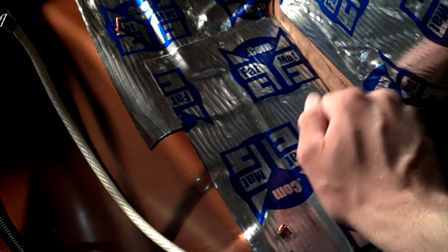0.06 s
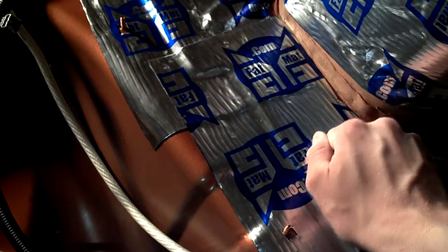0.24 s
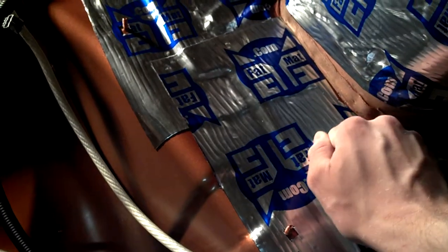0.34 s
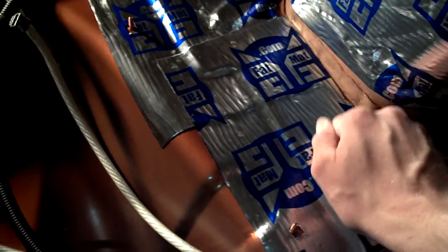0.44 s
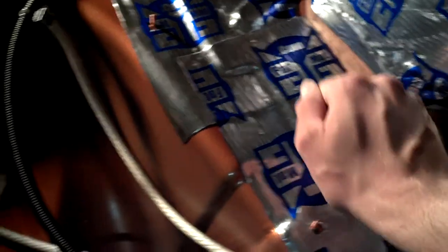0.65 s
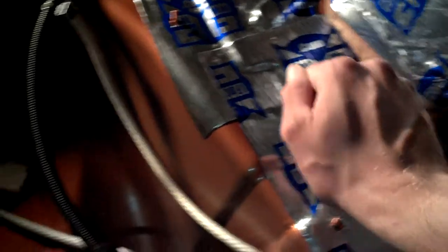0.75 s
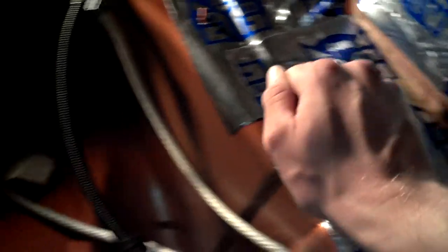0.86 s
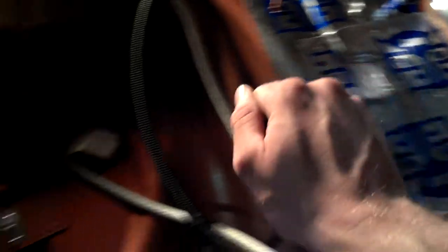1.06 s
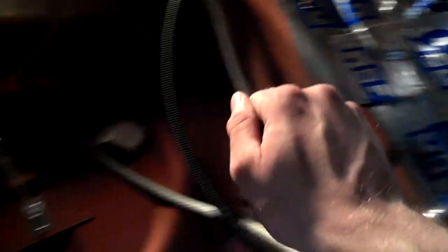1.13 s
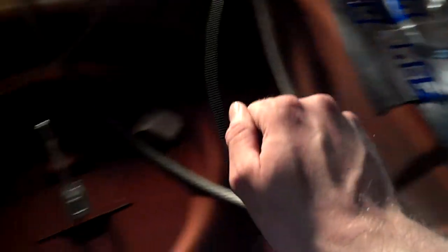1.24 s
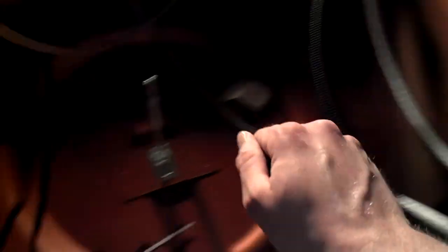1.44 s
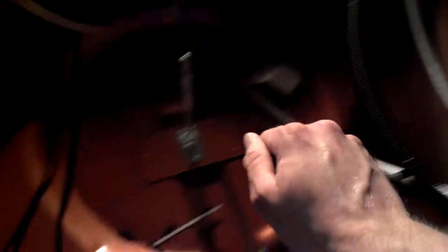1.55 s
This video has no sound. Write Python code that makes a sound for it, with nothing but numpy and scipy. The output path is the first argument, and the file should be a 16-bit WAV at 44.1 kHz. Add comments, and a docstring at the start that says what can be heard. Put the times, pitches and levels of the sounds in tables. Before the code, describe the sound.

Knuckles give one dull knock on a padded metal car panel, ringing briefly.

```python
"""Knuckles rap on a steel car panel lined with foil-faced damping mat, close to the microphone.
At the start an earlier knock is dying away over faint background hiss with a low hum.
At 0.23 s two knuckles land a few ms apart: the damped panel thuds and the foil ticks.
The bare car body echoes, its hollow hums on briefly, and then only the background is left."""
import sys
import numpy as np
from scipy import signal
from scipy.fft import rfft, irfft
from scipy.io import wavfile

SR = 44100
rng = np.random.default_rng(int(sys.argv[2]) if len(sys.argv) > 2 else 0)


def int16_out(signal):
    """Quantize to a 16-bit WAV file."""
    q = np.round(np.clip(np.atleast_2d(signal).T, -1, 1) * 32767)
    wavfile.write(sys.argv[1], SR, q.astype(np.int16))


N = 70560
BINS_HZ = np.arange(N // 2 + 1) * SR / N


def undb(db):
    """Decibels to gain."""
    return 10 ** (np.asarray(db) / 20)


def envelope(age_s, t60_s, rise_s):
    """Rise from age 0, times a decay of 60 dB per t60_s."""
    age_s = np.maximum(age_s, 0)
    return (1 - np.exp(-age_s / rise_s)) * np.exp(-np.log(1000) * age_s / t60_s)


def at_hz(hz, table, column):
    """One table column, interpolated over log frequency."""
    table = np.array(table)
    return np.interp(np.log(np.maximum(hz, 1)), np.log(table[:, 0]), table[:, column])


def noise(table, correlation):
    """Stereo noise of rms 1 with the table's colour and the given left-right correlation."""
    gain = undb(at_hz(BINS_HZ, table, column=1))
    mid, side = rfft(rng.standard_normal((2, N))) * gain / np.sqrt(np.mean(gain ** 2))
    mid = mid * np.sqrt((1 + correlation) / 2)
    side = side * np.sqrt((1 - correlation) / 2)
    return irfft(np.array([mid + side, mid - side]), N)


def ring(age_s, modes, rise_s):
    """Struck modes as decaying sines; neighbours start in opposite directions."""
    out = 0
    for k, (pitch_hz, level_db, t60_s, pan_db) in enumerate(modes):
        polarity = (-1) ** (k + 1)
        swing = polarity * np.sin(2 * np.pi * pitch_hz * age_s) * envelope(age_s, t60_s, rise_s)
        out = out + swing * undb(level_db + np.array([[pan_db], [-pan_db]]) / 2)
    return out


# background hiss spectrum: freq_hz, relative_density_db, stereo_correlation
HISS_SPECTRUM = [(30, -35, 0.1), (70, -19, 0.1), (116, 5.5, 0.05), (160, -5.5, 0.0), (370, 1, 0.0),
                 (700, -7, 0.25), (1300, -9, 1), (1960, -11, 0.1), (2562, -23.5, 0.0), (3500, -12.5, 0.3),
                 (7000, -19, 0.1), (15000, -23, 0.15)]
# background hiss envelope: time_s, level_db
HISS_ENVELOPE = [(0.0, -65), (0.6, -67.5), (0.9, -65.5), (1.6, -65)]


def background_hiss(time_s):
    """Faint background hiss with a low hum; the level dips slightly and recovers."""
    hiss = noise(HISS_SPECTRUM, at_hz(BINS_HZ, HISS_SPECTRUM, column=2))
    level_db = np.interp(time_s, *np.array(HISS_ENVELOPE).T)
    return hiss * undb(level_db)


# cavity modes: pitch_hz, level_db, t60_s, left_minus_right_db
CAVITY_MODES = [(130.62, -51.5, 0.74, -7.5), (303, -31, 0.23, 4), (402, -20.5, 0.38, -3.5),
                (487.4, -40, 0.4094, 3.5), (682, -39, 0.3435, -2.5), (789, -37.5, 0.6, 1)]


def body_cavity(age_s):
    """The hollow of the body builds up slowly and hums on, reaching the right microphone first."""
    lag_s = np.array([[0.0004], [0]])
    return ring(age_s - lag_s, CAVITY_MODES, rise_s=0.03494)


# shell reverberation: freq_hz, relative_density_db, t60_s, stereo_correlation
SHELL_REVERB = [(49.93, -41.5, 0.92, 0.5), (120, -12, 0.41, 0.5), (194.4, -15, 0.26, 0.2),
                (306.9, 0, 0.65, 0.3), (430, 3.5, 0.43, 0), (700, -4, 0.4185, 0.9), (1120.9, -11, 0.27, 1),
                (1600, -19.5, 0.51, 0.75), (2300, -35, 0.13, 0.1), (4000, -42.5, 0.24, 0.2),
                (6900, -48, 0.17, 0.3), (14000, -68.5, 0.12, 0.1)]


def shell_echoes(age_s):
    """Dense echoes inside the car body: strong first ones, then a tail whose treble dies first."""
    gain_db, early_boost_db, build_s = -25, 14, 0.00683
    wash = noise(SHELL_REVERB, at_hz(BINS_HZ, SHELL_REVERB, column=3))
    echoes = undb(early_boost_db) * wash * envelope(age_s, t60_s=0.09, rise_s=build_s)
    spectrum = rfft(wash)
    for centre_hz in 44 * 2 ** np.arange(0, 9, .5):  # triangular bands, half an octave apart
        distance_oct = abs(np.log2(np.maximum(BINS_HZ, 1) / centre_hz))
        band = irfft(spectrum * np.maximum(1 - 2 * distance_oct, 0), N)
        t60_s = at_hz(centre_hz, SHELL_REVERB, column=2)
        echoes = echoes + band * envelope(age_s, t60_s, build_s)
    return undb(gain_db) * echoes


# foil spectrum: freq_hz, relative_density_db
FOIL_SPECTRUM = [(300, -12), (1500, -2.5), (2700, -3.5), (4000, -14), (6000, -10.5), (9000, -16),
                 (15000, -28)]


def foil_tick(age_s, contact_s):
    """The mat's foil face gives a short, bright tick as the panel is hit."""
    hiss = noise(FOIL_SPECTRUM, correlation=0.307)
    return undb(-35.5) * hiss * envelope(age_s, t60_s=0.016, rise_s=contact_s)


# panel modes: pitch_hz, level_db, t60_s, left_minus_right_db
PANEL_MODES = [(292, -27.5, 0.235, 1.15), (347.77, -4.5, 0.062, -3.0), (416.17, -5, 0.125, -4),
               (508, -22.5, 0.2227, 0.9), (660.37, -6.5, 0.11, 3), (862.65, -12, 0.037, 2.06),
               (936, -15, 0.1, 5), (998.3, -28.5, 0.17, -0.65), (1178.8, -9.5, 0.068, -0.5),
               (1292.2, -24, 0.08, 2.5), (1390, -28, 0.08, 1), (1589.5, -28, 0.058, 8.7),
               (1700.9, -25.5, 0.085, -7), (2041, -36, 0.076, -2.71)]


def knuckle_on_panel(age_s, contact_s=0.0005):
    """One knuckle lands: the damped steel thuds and its foil ticks."""
    return ring(age_s, PANEL_MODES, rise_s=contact_s) + foil_tick(age_s, contact_s)


# knocks: start_s, level_db
KNOCK_EVENTS = [(-0.10, 1), (0.2275, -1.5)]


def scene():
    """Over the background hiss, each knock is two knuckles on the panel and the body's answer."""
    second_lag_s, second_db = 0.0038, -6.2
    time_s = np.arange(N) / SR
    out = background_hiss(time_s)
    for start_s, level_db in KNOCK_EVENTS:
        age_s = time_s - start_s
        first_knuckle = knuckle_on_panel(age_s)
        second_knuckle = undb(second_db) * knuckle_on_panel(age_s - second_lag_s)
        body = shell_echoes(age_s) + body_cavity(age_s)
        out = out + undb(level_db) * (first_knuckle + second_knuckle + body)
    return out


def record(dry):
    """Fade-in, clipping at full scale, steep low-pass."""
    fade_in_s, drive_db, cutoff_hz = 0.002, 0.5, 15300
    fade_in = np.minimum(np.arange(N) / SR / fade_in_s, 1)
    clipped = np.clip(dry * fade_in * undb(drive_db), -1, 1)
    low_pass = signal.ellip(8, .2, 70, cutoff_hz, fs=SR, output="sos")
    return signal.sosfilt(low_pass, clipped)


dry = scene()
out = record(dry)
int16_out(out)
```